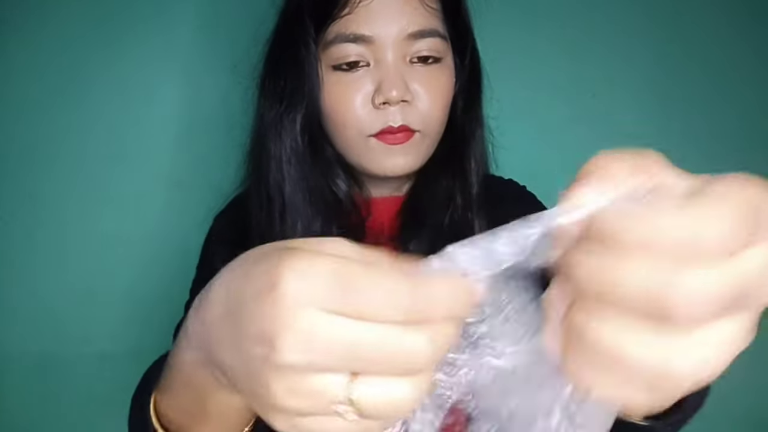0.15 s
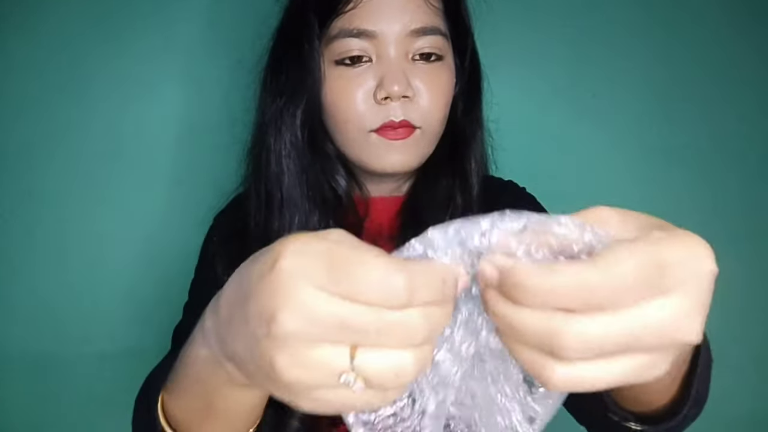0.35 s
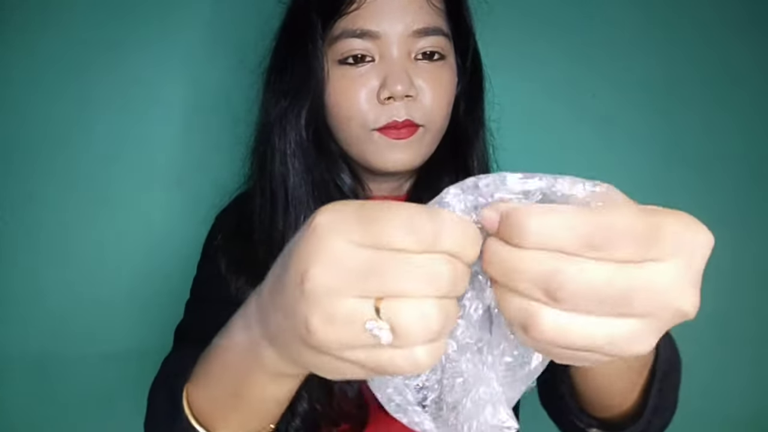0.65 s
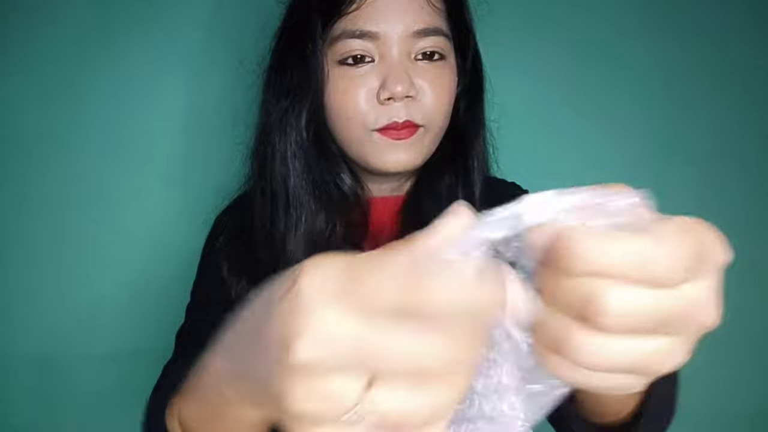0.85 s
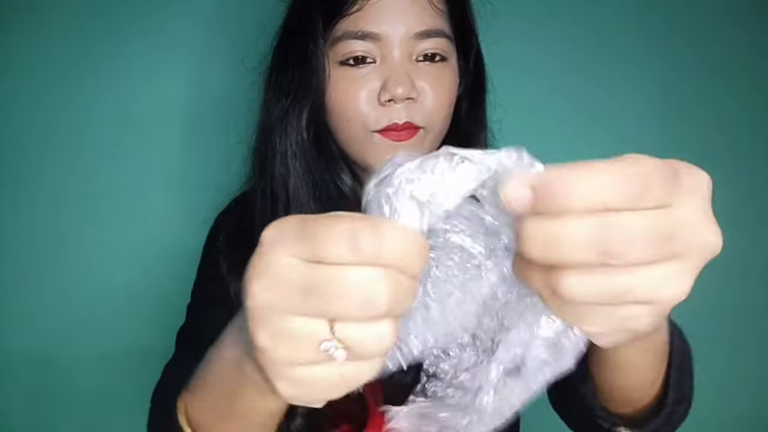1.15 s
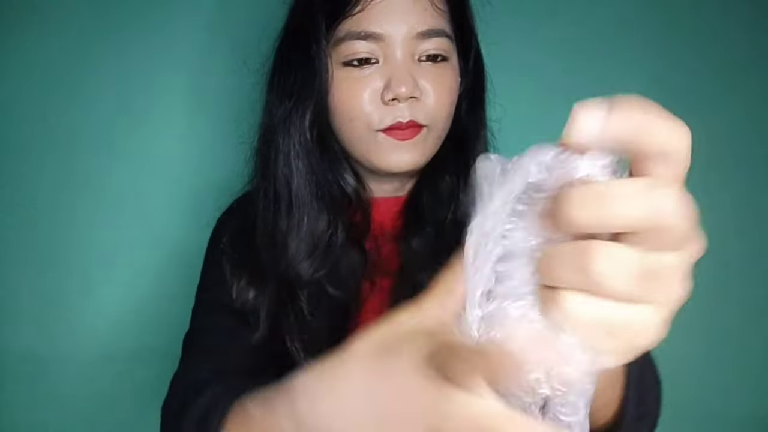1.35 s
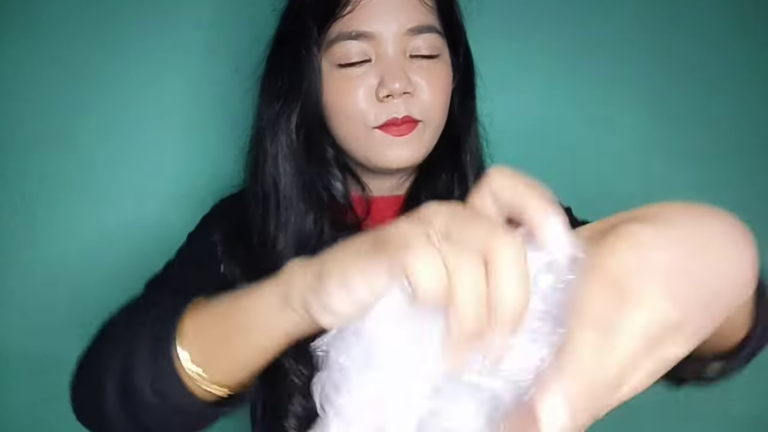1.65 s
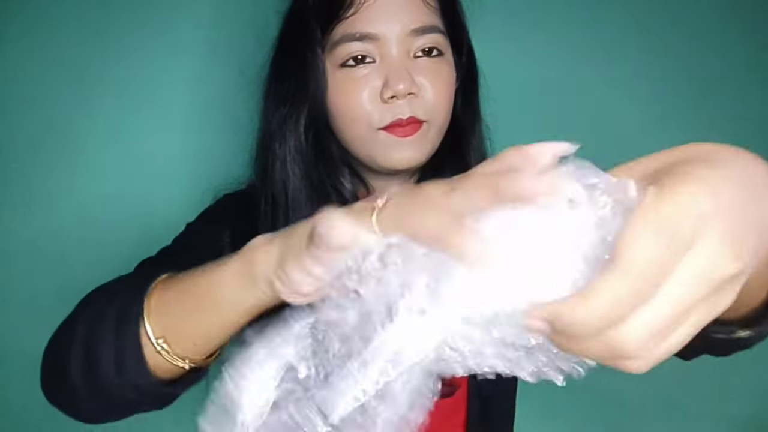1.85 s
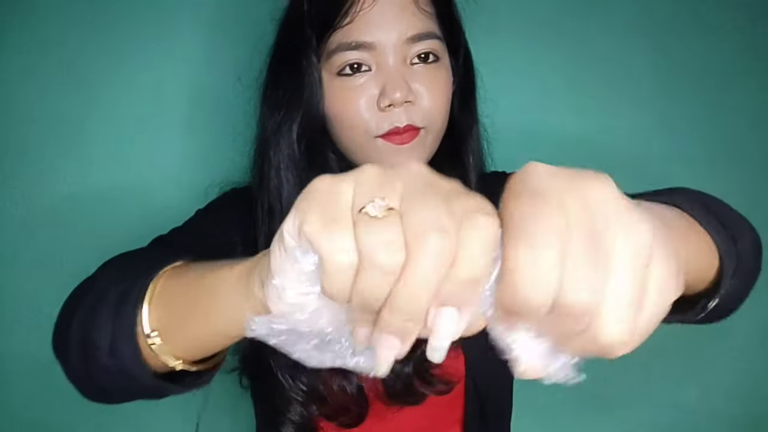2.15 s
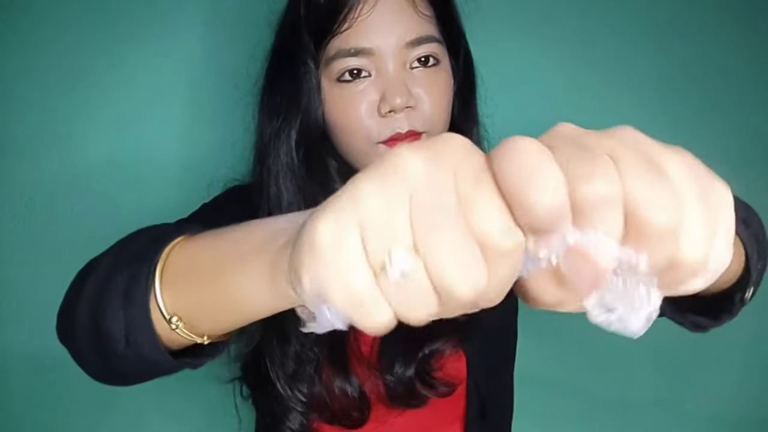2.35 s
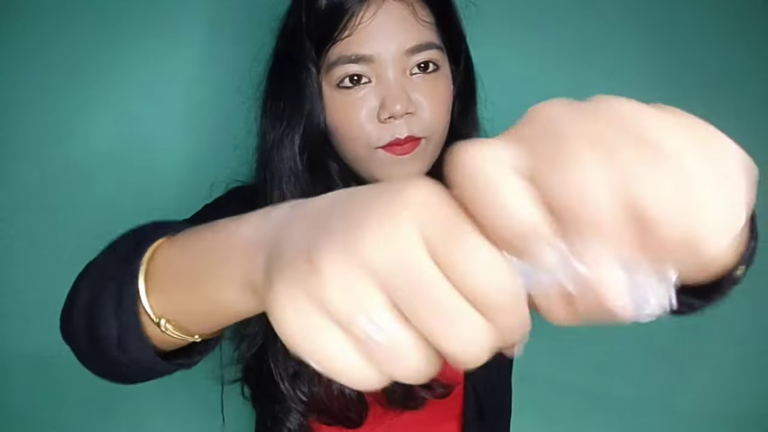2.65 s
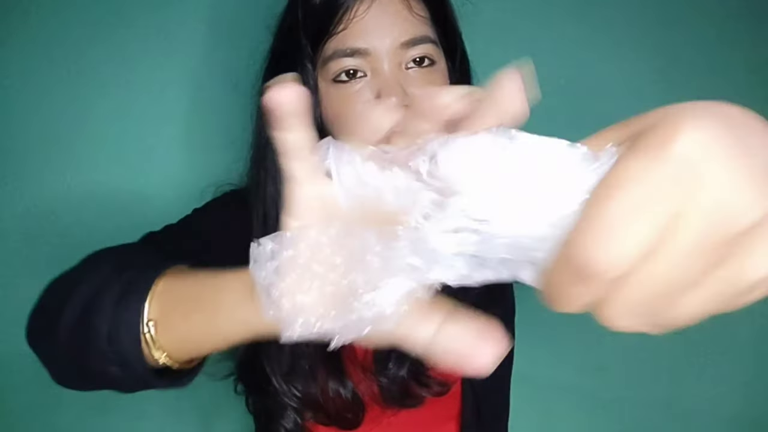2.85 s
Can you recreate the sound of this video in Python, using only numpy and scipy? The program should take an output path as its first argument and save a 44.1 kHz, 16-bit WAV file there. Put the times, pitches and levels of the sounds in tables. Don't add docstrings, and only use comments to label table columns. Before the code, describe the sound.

Bubble wrap crackles in two hands, very close, wide and slightly left. Light pinching ticks and small pops until 0.45 s, then taut pulls with sharp snaps near 0.65 and 0.8. Looser unfolding crinkles from 1.0 to 1.55, then dense, fuller crumpling to 2.2. Uneven twists follow, with loud cracks near 2.37, 2.54 and 2.73. Soft low handling thumps, faint hush, dry quiet room.

```python
import sys
import numpy as np
from scipy import signal
from scipy.fft import rfft, irfft
from scipy.io import wavfile
from scipy.ndimage import uniform_filter1d

SR = 44100
rng = np.random.default_rng(int(sys.argv[2]) if len(sys.argv) > 2 else 0)


def transcribe(signal):
    frames = np.atleast_2d(signal).T
    limited = np.clip(frames, -1, 1)
    pcm = np.round(limited * 32767).astype(np.int16)
    wavfile.write(sys.argv[1], SR, pcm)


def makeup_ratio(level_db):
    decades = np.asarray(level_db, float) / 20
    return 10 ** decades


N = 132300

LEAD_S, PAN_DB = .000022, 2


def evened(x):
    return x / np.sqrt(np.mean(x ** 2) + 1e-20)


def read(points, hz):
    f, value = np.transpose(points)
    return np.interp(np.log(hz + 1), np.log(f + 1), value)


def causal(db):
    log = np.log(makeup_ratio(np.concatenate([db, db[-2:0:-1]])))
    return np.fft.ifft(np.exp(np.conj(signal.hilbert(log)))).real[:len(db)]


def shaped(points, shape):
    gain = makeup_ratio(read(points, np.fft.rfftfreq(N, 1 / SR)))
    return evened(irfft(rfft(rng.standard_normal(shape)) * gain, N))


def drift(seconds):
    width = max(round(seconds * SR), 1)
    smooth = uniform_filter1d(rng.standard_normal(N), width)
    return evened(uniform_filter1d(smooth, width))


def ports(x, lead_s, pan_db):
    size = len(x) + 64
    delay_s = 32 / SR + np.array([[-.5], [.5]]) * lead_s
    turn = np.exp(-2j * np.pi * np.fft.rfftfreq(size, 1 / SR) * delay_s)
    return irfft(rfft(x, size) * turn, size) * makeup_ratio(np.array([[.5], [-.5]]) * pan_db)


# time in seconds, effort in dB, slack of the film in dB.
PINCHES = [
    [(0, -36.5, -5), (.05, -38, 2), (.09, -39, 0), (.12, -34, -2), (.18, -37.5, 0), (.26, -45.5, 0),
     (.32, -35.5, -13.5), (.37, -47, -0.5), (.43, -49.5, -1)],
    [(.46, -44, -18), (.50, -29, -8), (.54, -47.5, 0), (.58, -43.5, -14), (.62, -47.5, 0), (.70, -37, -2.5),
     (.76, -45.5, 4), (.83, -32, -1), (.95, -49.5, 9)],
    [(1.0, -45, 0), (1.04, -42.5, 3.5), (1.13, -39.5, 6), (1.22, -42.5, 6), (1.26, -34, 5),
     (1.31, -38.5, 3.5), (1.46, -33, 8.5), (1.51, -39.5, 8.5), (1.57, -58.5, 10)],
]
# time in seconds, effort in dB, slack of the film in dB.
TWISTS = [
    [(1.61, -47, 5.5), (1.65, -28, 4), (1.74, -36, 10), (1.81, -36, 9), (1.91, -40.5, 10), (2.01, -28.5, 7),
     (2.04, -38.5, 10), (2.12, -32, 8), (2.15, -37, 5.5)],
    [(2.24, -34.5, -2.5), (2.31, -50.5, -7), (2.35, -35, 2), (2.40, -31, -8), (2.45, -51, 12),
     (2.50, -57, 2), (2.56, -30, -13), (2.62, -49, -5.5), (2.655, -59, -10)],
    [(2.68, -39.5, -4), (2.72, -29, -16), (2.76, -34.5, 1), (2.81, -44, 5.5), (2.86, -48, 12.5),
     (2.88, -46, 1.5), (2.91, -41.5, -4.5), (2.94, -35.5, 5.5), (3, -37, -1.5)],
]


def hands():
    s, effort_db, slack_db = np.concatenate([np.array(g) for g in PINCHES + TWISTS]).T
    t = np.arange(N) / SR
    power = makeup_ratio(2 * np.interp(t, s, effort_db))
    calm_db = 10 * np.log10(power)
    for at, peak_db, *_ in SNAPS:
        strain_s, settle_s = .005, .004
        away = np.where(t < at, (at - t) / strain_s, (t - at) / settle_s)
        power += makeup_ratio(2 * (peak_db - 24)) * np.exp(-2 * away)
    for at, peak_db, _ in CLICKS + TWIST_CLICKS:
        strain_s, settle_s = .001, .007
        near = slice(round(at * SR) - 800, round(at * SR) + 1600)
        since = t[near] - at
        away = np.maximum(-since / strain_s, since / settle_s)
        power[near] += makeup_ratio(2 * (peak_db - 18)) * np.exp(-2 * away)
    return 10 * np.log10(power), calm_db, np.interp(t, s, slack_db)


def train(per_s, size_db):
    draw = rng.random((3, N))
    happens = draw[1] < per_s / SR
    size = makeup_ratio(size_db * np.minimum(-np.log(draw[2] + 1e-9), 4.5))
    return np.sign(draw[0] - .5) * happens * size


def crinkle(effort_db, calm_db, slack_db, count=32, places=12):
    clicks, ticks = train(per_s=9000, size_db=2.6), train(per_s=9000, size_db=3)
    patch = rng.integers(0, count, N)
    place = rng.standard_normal((count, 2))
    pans_db = PAN_DB + 3 * place[:, 1]
    t = np.arange(1024) / SR
    busy = [makeup_ratio(2.4 * drift(.04)) for _ in range(count // 4)]
    rings, wide = np.zeros((2, 2, N))
    for k, hz in enumerate(np.geomspace(200, 7000, count)):
        u = t * hz / (7 * rng.uniform(.5, 1.5))
        ring = (1 - np.exp(-4 * u)) * np.exp(-u) * np.sin(2 * np.pi * hz * t)
        ring = evened(ring) * np.sqrt(hz / 4000)
        lead_s = np.clip(LEAD_S + .15 * place[k, 0] / hz, -.001, .001)
        hits = clicks * busy[k // 4] * (patch == k)
        rings += signal.oaconvolve(hits[None], ports(ring, lead_s, pans_db[k]), axes=1)[:, :N]
    for k in range(places):
        pair = ports(np.ones(1), LEAD_S + .00015 * place[k, 0], pans_db[k])
        wide += signal.oaconvolve((ticks * (patch % places == k))[None], pair, axes=1)[:, :N]
    tick_db = 1.5 - 1.8 * (calm_db - effort_db)
    film = evened(rings) + makeup_ratio(tick_db) * evened(wide)
    low = signal.sosfiltfilt(signal.butter(2, 3500, fs=SR, output="sos"), film)
    film = film + low * (makeup_ratio(slack_db) - 1)
    clump_db, swell_db = 1.2 * drift(.005), 2 * drift(.017)
    return film * makeup_ratio(effort_db + clump_db + swell_db)


# time in seconds, peak in dB, push of air in dB, ring of the fold in Hz, near echo in dB.
SNAPS = [(0.1128, -22, -28, 3500, 1), (0.1936, -15, -30, 3180, -8), (0.3002, -21, -19, 2200, -2),
         (0.472, -20, -24, 5230, -3), (0.4851, -17, -46, 4710, -4), (0.4999, -18, -22, 3250, 2),
         (0.6461, -8, -17, 4500, -3), (0.661, -13, -39, 3600, -9), (0.7739, -20, -31, 5000, -6),
         (0.7904, -11, -28, 4860, -10), (0.7998, -11, -12, 2000, -3), (1.2448, -17, -16, 2430, -6),
         (1.8627, -15, -26, 5370, 0), (1.9268, -13, -28, 2660, -9), (2.1696, -12, -30, 3500, -5),
         (2.3424, -25, -6, 2130, -6), (2.3704, -7, -20, 5200, -2), (2.3783, -15, -22, 5200, -3),
         (2.4314, -12, -26, 2500, 2), (2.5396, -4, -25, 5200, -2), (2.7341, -7, -45, 4970, -14)]
# time in seconds, peak in dB, left minus right in dB.
CLICKS = [(0.1426, -21, 13), (0.1529, -26, 7), (0.1768, -28, 5), (0.2007, -20, 4), (0.2832, -25, 3),
          (0.3193, -23, 5), (0.3768, -28, 8), (0.5044, -20, 10), (0.5309, -28, 5), (0.5641, -27, 15),
          (0.5805, -26, 11), (0.6245, -29, 10), (0.707, -21, 5), (0.7198, -25, 5), (0.7388, -28, -5),
          (0.766, -26, 1), (0.812, -19, 3), (0.8336, -17, 5), (1.0285, -28, 5), (1.0867, -20, 4),
          (1.0918, -21, 6), (1.1275, -18, 3), (1.1345, -17, 5), (1.1422, -15, 1), (1.1518, -20, 4),
          (1.1553, -16, 4), (1.1665, -20, 7), (1.1767, -21, 8), (1.181, -22, 5), (1.1966, -19, 3),
          (1.24, -20, -2), (1.2507, -19, 4), (1.3089, -24, 6), (1.3396, -17, 4), (1.3508, -21, 3),
          (1.449, -15, 0), (1.4624, -15, 5), (1.4842, -19, 4), (1.502, -19, 6), (1.5065, -20, 4),
          (1.5639, -29, -3)]
# time in seconds, peak in dB, left minus right in dB.
TWIST_CLICKS = [(1.612, -25, 2), (1.6286, -19, 3), (1.6332, -19, 5), (1.6366, -18, 0), (1.6488, -15, 2),
                (1.6591, -15, 3), (1.67, -12, 1), (1.6931, -15, -2), (1.6976, -15, 0), (1.701, -14, 1),
                (1.7192, -15, 4), (1.7317, -14, -1), (1.7407, -18, -1), (1.765, -17, 1), (1.7813, -17, 1),
                (1.799, -20, 5), (1.839, -18, 5), (1.8781, -18, 3), (1.8814, -16, 0), (1.8981, -19, 3),
                (1.9313, -17, 5), (1.9378, -15, 4), (1.9484, -13, 1), (1.968, -17, 2), (1.9733, -18, 3),
                (1.9842, -18, 5), (2.003, -11, 6), (2.0128, -11, -2), (2.0355, -19, 4), (2.059, -17, 5),
                (2.0935, -17, 4), (2.0977, -15, 4), (2.1085, -13, 0), (2.1112, -16, 6), (2.1243, -16, 3),
                (2.1403, -19, 0), (2.1875, -21, 4), (2.2832, -29, 3), (2.5551, -15, 8), (2.5745, -19, 6),
                (2.6522, -33, 3), (2.6662, -31, 3), (2.6916, -24, 0), (2.7114, -21, 7), (2.7168, -19, 5),
                (2.7569, -18, 1), (2.7771, -17, 5), (2.8687, -24, 6), (2.8819, -24, 6), (2.926, -23, 4),
                (2.952, -22, 6)]


def snaps(colour):
    crack, t = np.zeros((2, N + 4000)), np.arange(1024) / SR
    small = CLICKS + TWIST_CLICKS
    chance = rng.standard_normal((len(SNAPS + small), 2, len(t)))
    rows = [(s, db + 1, push_db, hz, makeup_ratio(echo_db), 3.5) for s, db, push_db, hz, echo_db in SNAPS]
    for (s, db, pan_db), c in zip(small, chance[len(SNAPS):]):
        ring_hz = 3580 * np.exp(.4 * np.tanh(c[0, -1]))
        rows.append((s, db + 1.5, -36, ring_hz, 0, pan_db))
    rise_s, fall_s, echo_s, push_hz = .0001, .0005, .0015, 1050
    shape = (1 - np.exp(-t / rise_s)) * np.exp(-t / fall_s)
    spike = (np.arange(len(t)) == 4) * [[1], [0]]
    hz, late = np.linspace(0, SR / 2, 257), round(echo_s * SR)
    for (s, peak_db, push_db, ring_hz, echo, pan_db), tear in zip(rows, chance):
        ring_db = 5 / (1 + (2 * (hz - ring_hz) / 1600) ** 2)
        fold = causal(-2.5 * np.log2(1 + hz / 4000) + ring_db)
        drive = .3 * shape * tear + np.sign(tear[1, -1]) * spike
        drive = drive + echo * np.roll(drive * [[1], [-1]], late, axis=1)
        voice = np.convolve(fold, colour[:len(t)])[None]
        noise, other = signal.fftconvolve(voice, drive, axes=1)[:, :len(t)]
        top = np.argmax(abs(noise[:40]))
        at = round(s * SR) - 32
        pair = ports(noise, LEAD_S, pan_db) + ports(.9 * other, 0, pan_db) * [[1], [-1]]
        crack[:, at - top:at - top + len(t) + 64] += makeup_ratio(peak_db) / abs(noise[top]) * pair
        u = 2 * push_hz * (t - 44 / SR)
        push = ports(-2 * u * np.exp(-2 * u ** 2), LEAD_S, 1)
        crack[:, at - 44:at + len(t) + 20] += makeup_ratio(peak_db + push_db + 9) * push
    return crack[:, :N]


# frequency in Hz, level in dB per Hz.
MIC = [(60, -27.5), (300, -23), (1500, -14.5), (2200, -7.5), (4200, -8.5), (6800, -11), (11500, -10.5),
       (12200, -6)]
# frequency in Hz, width in Hz, boost in dB.
BODY = [(342, 120, 6.5), (930, 250, 3), (2840, 140, 4.5)]


def film_colour():
    hz = np.linspace(0, SR / 2, 2049)
    folds_db = sum(db / (1 + (2 * (hz - f) / width) ** 2) for f, width, db in BODY)
    port_db = 8.5 / (1 + (2 * (hz - 5208) / 1350) ** 4)
    return causal(read(MIC, hz) + folds_db + port_db)


def room(x):
    t, taps = np.arange(8000) / SR, rng.standard_normal((2, 8000))
    t60_s, treble_t60_s = .08, .04
    dull = signal.lfilter([.3], [1, -.7], taps)
    tail = dull * makeup_ratio(-60 * t / t60_s) + (taps - dull) * makeup_ratio(-60 * t / treble_t60_s)
    tail = tail * (t > .003)
    return signal.fftconvolve(x, tail / np.linalg.norm(tail[0]), axes=1)[:, :N]


# frequency in Hz, level in dB per Hz.
RUMBLE = [(25, -8.5), (70, -2), (135, 2), (200, -5), (380, -14), (700, -37)]
# start in seconds, level in dB.
THUMPS = [(0.2, -46), (0.299, -50), (0.797, -36.5), (1.05, -54), (1.32, -42), (1.36, -46), (1.511, -47.5),
          (1.64, -44.5), (1.72, -46), (1.88, -49), (1.998, -44), (2.04, -48), (2.366, -33.5), (2.54, -80)]


def rumble(effort_db):
    a, b = shaped(RUMBLE, (2, N))
    same, pan_db, puff_s = .6, 6, .009
    pair = np.array([a, same * a + np.sqrt(1 - same ** 2) * b])
    pair = pair * makeup_ratio([[pan_db / 2], [-pan_db / 2]])
    t = np.arange(N) / SR
    puffs = sum(makeup_ratio(db) * np.exp(-((t - s - puff_s) / puff_s) ** 2) for s, db in THUMPS)
    steady_db = -59 + .18 * (effort_db + 24.5) + 2.6 * drift(.02)
    return pair * (makeup_ratio(steady_db) + puffs)


# frequency in Hz, level in dB per Hz.
HUSH = [(24, -38), (40, -1), (135, -8), (402, -30), (1090, -16), (4680, -7), (14800, -18), (16000, -5)]


def hush():
    return makeup_ratio(-100) * shaped(HUSH, (2, N))


def scene():
    effort_db, calm_db, slack_db = hands()
    colour = film_colour()
    creases = crinkle(effort_db, calm_db, slack_db)
    film = signal.oaconvolve(creases, colour[None] / np.linalg.norm(colour), axes=1)[:, :N]
    film = film + snaps(colour)
    return film + makeup_ratio(-14) * room(film) + rumble(effort_db) + hush()


def low_pass(x):
    return signal.sosfilt(signal.butter(12, 16640, fs=SR, output="sos"), x)


def record(dry):
    edge = signal.firwin(151, 15700, window=("kaiser", 6), fs=SR)
    x = signal.oaconvolve(dry, edge[None], "same")
    ceiling = 1.2
    return low_pass(ceiling * np.tanh(x / ceiling))


dry = scene()
out = record(dry)
transcribe(out)
```